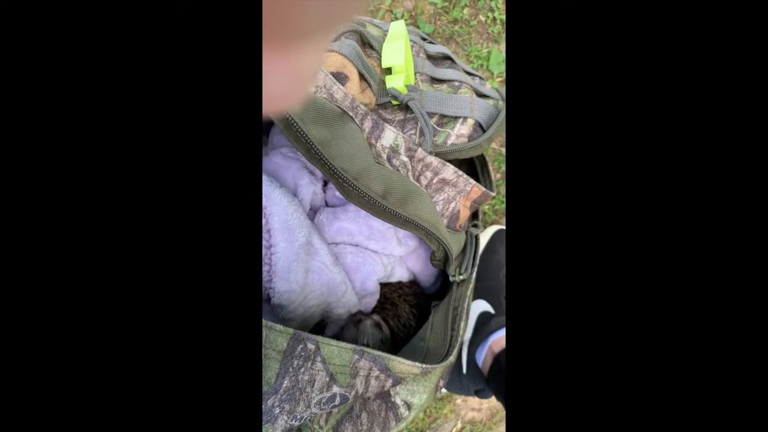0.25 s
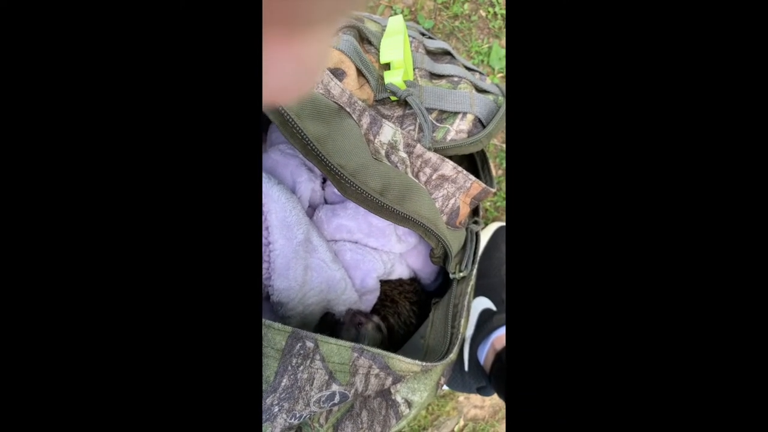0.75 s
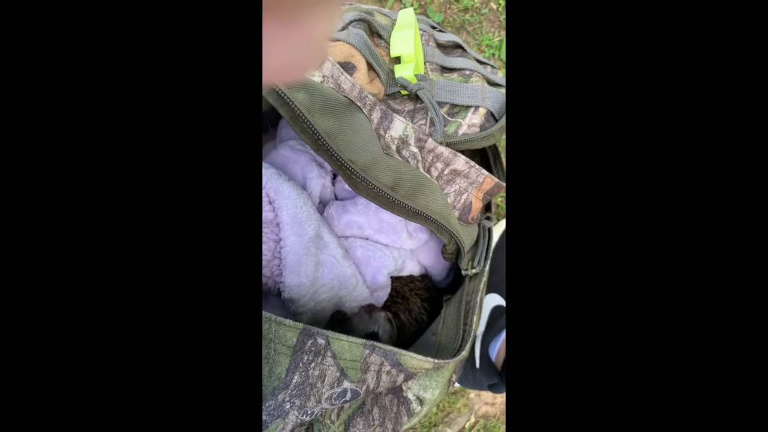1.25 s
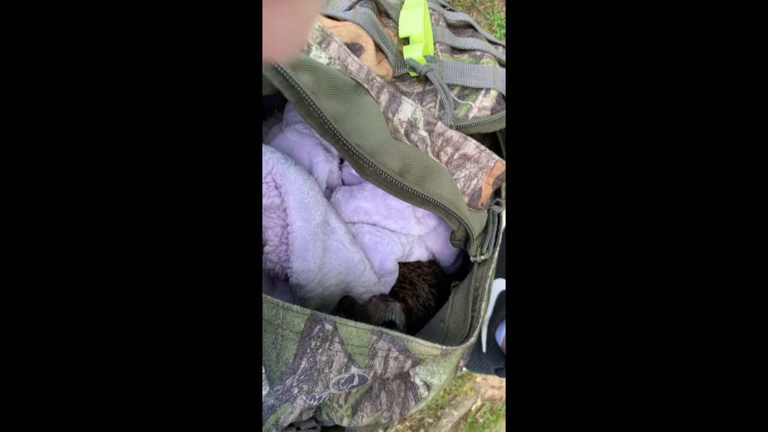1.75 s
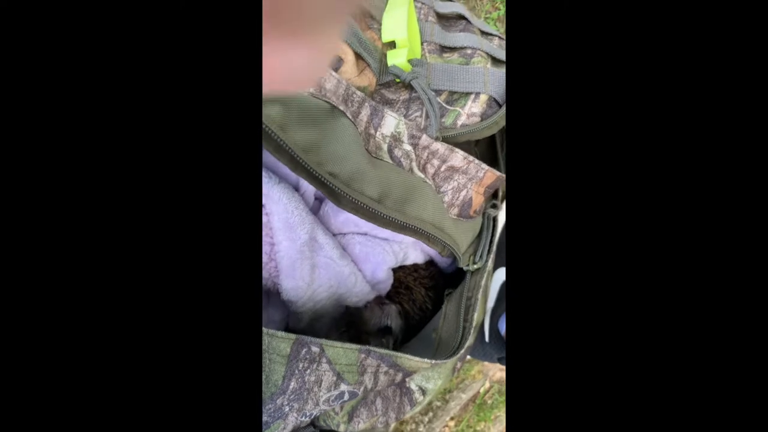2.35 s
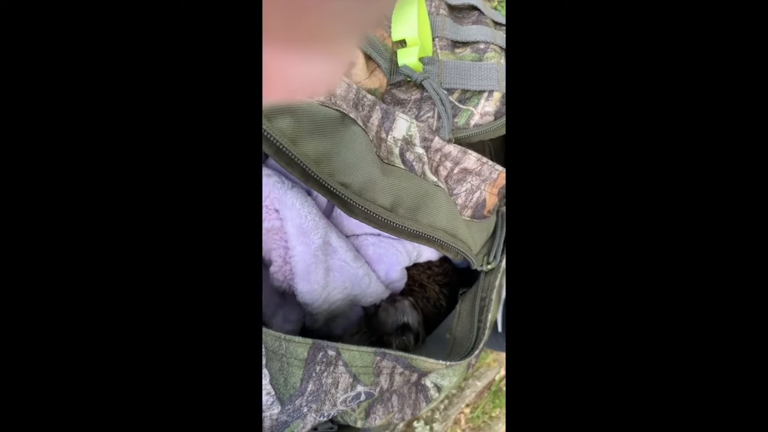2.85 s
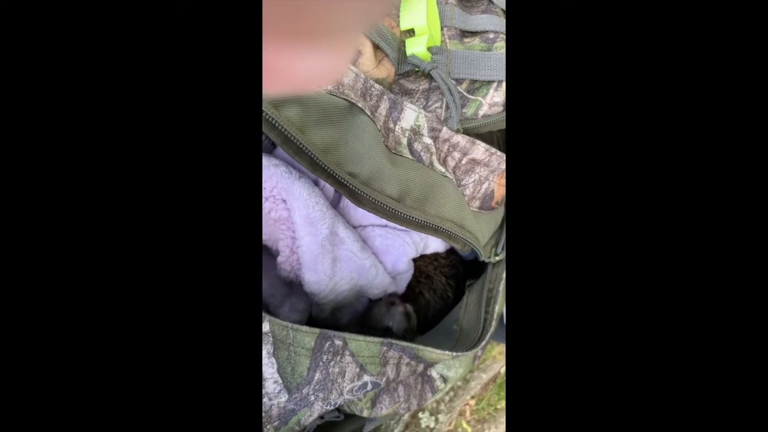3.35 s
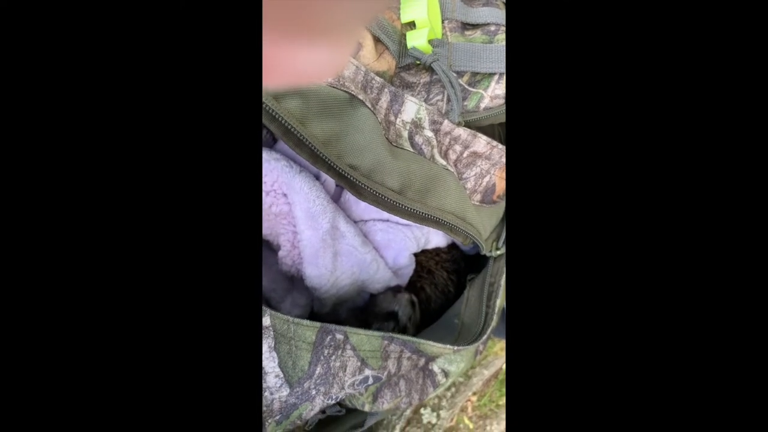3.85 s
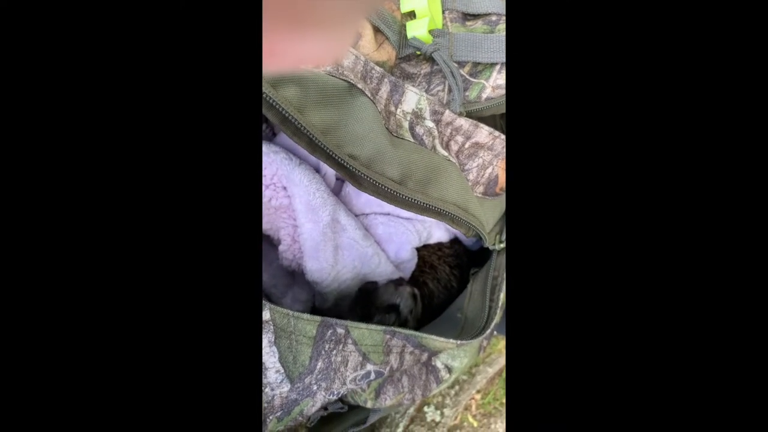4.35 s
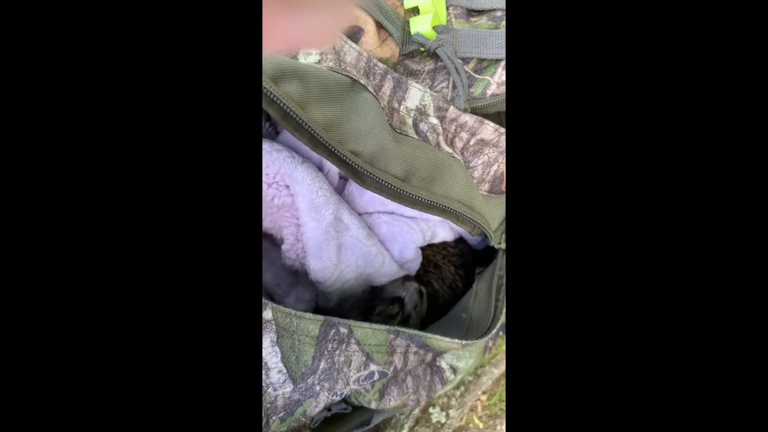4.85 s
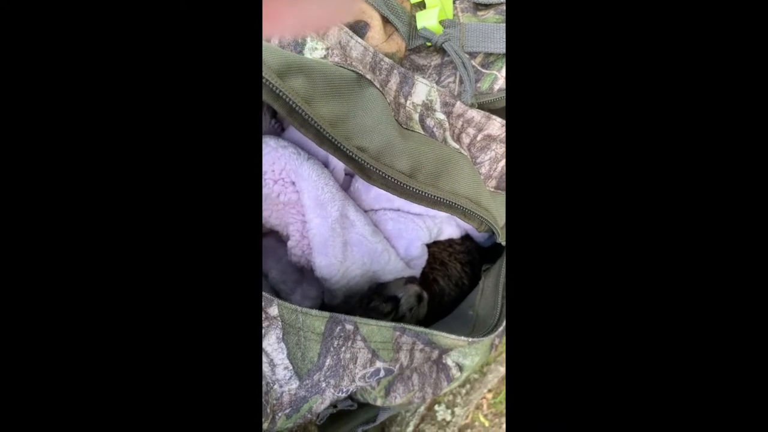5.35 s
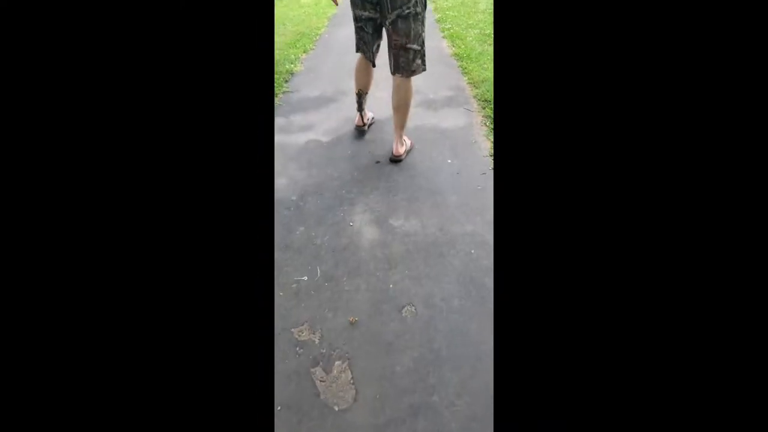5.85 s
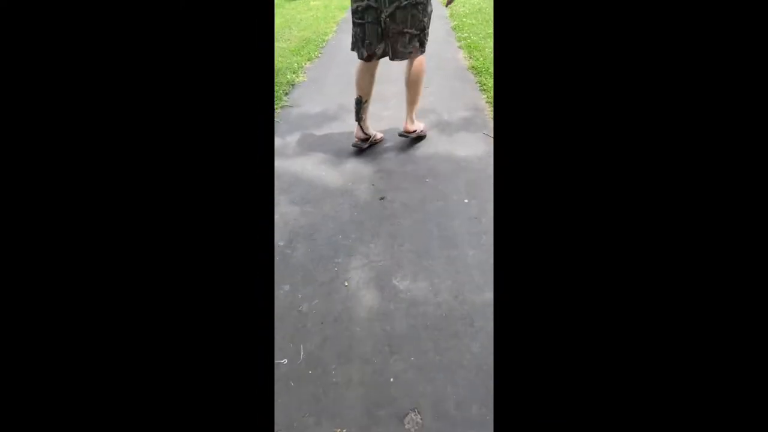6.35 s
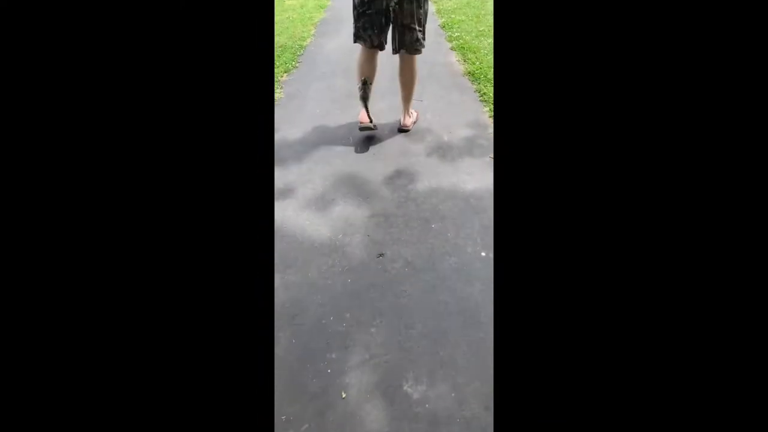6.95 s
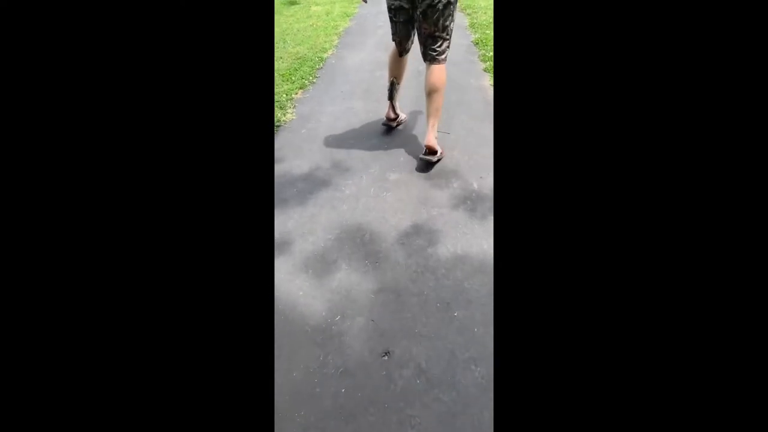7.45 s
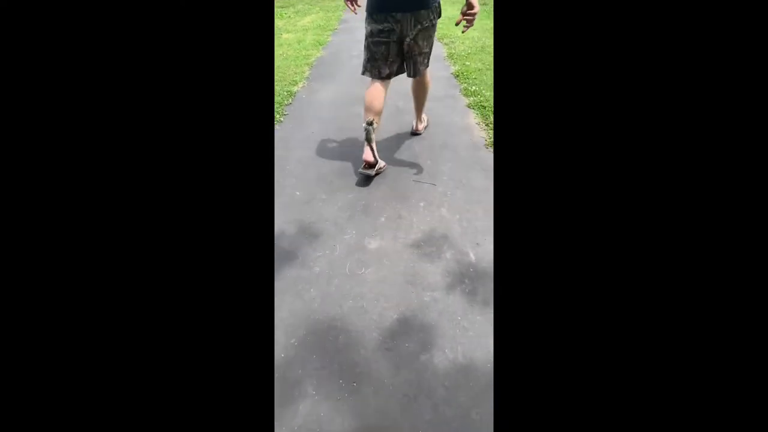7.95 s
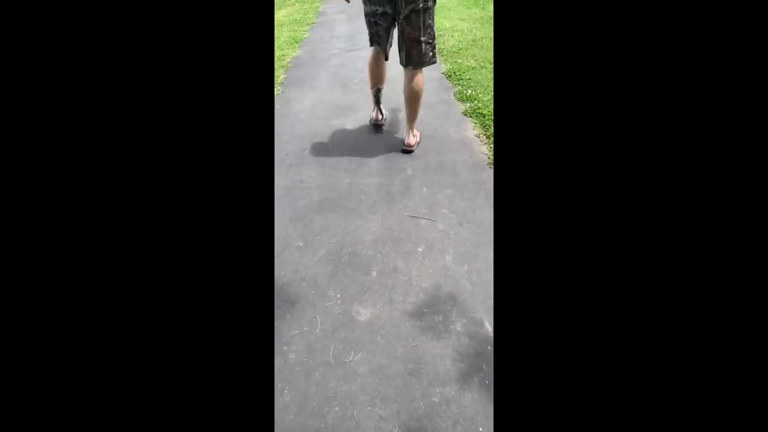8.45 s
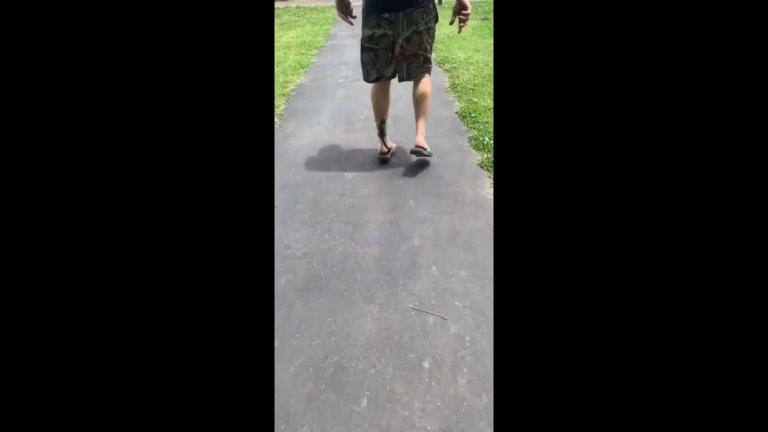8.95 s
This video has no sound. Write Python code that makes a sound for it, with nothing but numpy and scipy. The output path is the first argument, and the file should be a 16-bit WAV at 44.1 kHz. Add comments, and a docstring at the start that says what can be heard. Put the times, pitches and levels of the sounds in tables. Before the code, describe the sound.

Close, loud wind buffets overload a phone microphone in the grass, masking soft high hiss, brief chirps and low engine drone. A hard cut and a momentary gap lead to a calmer paved path, in mono, where a walker's flip-flops give small dry clicks and gritty scuffs over a pulsing distant engine hum, faint insects and a few tiny metallic jingles.

```python
"""Outdoors in the grass on a breezy day, heard by a phone with two microphone ports, then on a path.
In the grass, shaped noise makes the rumble, wash and buffets of wind; far hiss, gliding bird whistles and
the low notes of two distant engines lie behind. After a hard cut and a short silence comes the path, in mono:
engine notes of nearly equal pitch throb together over soft noise and a thin band of insects. Short noise
bursts and knocks make sandals click and scuff on asphalt, and shaken resonances make something small jingle."""
import sys
import numpy as np
from scipy import signal
from scipy.fft import rfft, irfft, next_fast_len
from scipy.io import wavfile
from scipy.ndimage import uniform_filter1d

SR = 44100
rng = np.random.default_rng(int(sys.argv[2]) if len(sys.argv) > 2 else 0)


def master_out(mix):
    """Clip the mix to full scale and print it as 16-bit PCM to the path in sys.argv[1]."""
    frames = np.transpose(np.atleast_2d(mix))
    ceiling = np.clip(frames, -1, 1)
    pcm = np.round(ceiling * 32767).astype(np.int16)
    wavfile.write(sys.argv[1], SR, pcm)


N = 406161
TIME = np.arange(N) / SR  # s
SIZE = next_fast_len(N)
HZ = np.arange(SIZE // 2 + 1) * SR / SIZE + 1e-3  # just above zero, so that the logarithm exists
LOG_HZ = np.log(HZ)
CUT_S, RESUME_S = 5.7484, 5.836  # the grass stops, the path starts
LEFT_RIGHT = np.array([[1], [-1]])  # opposite signs on the two ports


def undb(db):
    """Turn decibels into a plain gain."""
    return 10 ** (np.asarray(db) / 20)


def curves(table):
    """Draw straight lines through each column of a table, over the times in its first column."""
    s, *columns = np.transpose(table)
    return [np.interp(TIME, s, column) for column in columns]


def walk(rate):
    """Random levels held for 1 / rate seconds, then smoothed twice into a wandering line; spread near 1."""
    hold = int(SR / rate)
    steps = np.repeat(rng.standard_normal(N // hold + 1), hold)
    return 1.289 * uniform_filter1d(uniform_filter1d(steps, hold), hold)[:N]


def shape(x, gain):
    """Filter x by a gain on HZ; white noise of rms 1 keeps rms 1."""
    even_gain = gain / np.sqrt(np.mean(abs(gain) ** 2))
    return irfft(rfft(x, SIZE) * even_gain, SIZE)[:N]


def colour(x, points):
    """Give x the tone of a spectrum; only the differences between its levels matter."""
    hz, db = np.transpose(points)
    return shape(x, undb(np.interp(LOG_HZ, np.log(hz), db, left=-120, right=-120)))


def gusty(points, rate, patchy_db):
    """Coloured noise whose source swells and flickers; rms 1."""
    level_db = patchy_db * (walk(rate) + 0.87 * walk(4 * rate))
    x = colour(rng.standard_normal(N) * undb(level_db), points)
    return x / np.std(x)


def eddies(points, rate, spread_db, bed_db):
    """Short puffs of noise, uneven in size, over a steadier stream, like small eddies breaking; rms 1."""
    hits = (rng.random(N) < rate / SR) * undb(spread_db * rng.exponential(size=N))  # rate: puffs per second
    puffs = uniform_filter1d(uniform_filter1d(hits, 150), 100)
    strength = (puffs / np.std(puffs) + undb(bed_db)) * undb(2 * walk(8.8))
    x = colour(strength * rng.standard_normal(N), points)
    return x / np.std(x)


def bursts(times, db, lengths, rise=1.):
    """Envelope of sharp bumps that grow over rise x length and die away over the length."""
    env = np.zeros(N)
    for s, gain, length in zip(times, undb(db), np.maximum(lengths, 5e-4)):
        near = slice(max(int((s - .1) * SR), 0), int((s + 0.14) * SR))
        t = TIME[near] - s
        env[near] += gain * np.exp(np.where(t < 0, t / rise, -t) / length)
    return env


def bumps(table):
    """Sum of smooth bell shapes from rows of time (s), height and length (s)."""
    s, height, length = np.transpose(table)[:, :, None]
    coarse = TIME[::32]  # smooth enough to draw on fewer points
    bells = np.sum(height * np.exp(-((coarse - s) / length) ** 2), axis=0)
    return np.interp(TIME, coarse, bells)


CANCEL_S = 7.82  # all engine cycles pass zero here, so notes of opposite sign oppose each other


def engine(hz, orders, drift, wobble_db):
    """Steady notes on multiples of a slowly drifting cycle; each note wavers on its way through the air."""
    turns = np.cumsum(hz * (1 + drift * walk(1.5))) / SR
    turns = turns - turns[int(CANCEL_S * SR)]
    notes = 0
    for multiple, db in orders:
        loudness = np.sqrt(2) * undb(db + wobble_db * walk(4))
        notes = notes + loudness * np.sin(2 * np.pi * multiple * turns)
    return notes


# High far hiss, tone: f/Hz, level/dB
HIGH_HISS_TONE = [(3500, -22), (3900, -1), (4600, 0), (5500, -5), (6800, -6), (7900, -14), (8700, -10),
                  (9400, -17), (11000, -20), (15500, -27)]
# High far hiss, loudness: t/s, level/dB
HIGH_HISS_LEVEL = [(0, -54), (.5, -59), (1.5, -56), (2.3, -58.5), (2.75, -58.5), (3, -56), (3.3, -58.5),
                   (4.2, -57.5), (4.6, -59), (5.2, -61.5), (5.75, -65.5)]
# How the high hiss meets the two ports: f/Hz, phase by which left leads/rad, share common to both/0-1
HISS_PORTS = [(3300, 1.3, .7), (3800, 1.7, .8), (4800, 3.14, .99), (5900, 4.75, .9), (6950, 6.28, .97),
              (8000, 7.8, .85), (9100, 9.42, .99), (10000, 10.7, .8), (15600, 18.9, .9)]


def high_hiss():
    """Far hiss: one part reaches the left port early, the rest is unrelated on the two ports."""
    hz, lead, share = np.transpose(HISS_PORTS)
    lead = np.interp(HZ, hz, lead)
    share = np.clip(np.interp(HZ, hz, share), 0, 1)
    swell = undb(1.1 * walk(7))
    common, left, right = (rfft(swell * rng.standard_normal(N), SIZE) for _ in range(3))
    turn, apart = np.exp(.5j * lead), np.sqrt(1 - share ** 2)
    left_spectrum = share * turn * common + apart * left
    right_spectrum = share / turn * common + apart * right
    ports = irfft(np.array([left_spectrum, right_spectrum]), SIZE)[:, :N]
    return undb(curves(HIGH_HISS_LEVEL)[0]) * np.array([colour(x, HIGH_HISS_TONE) for x in ports])


# Three lower bands of far hiss, tone of each: f/Hz, level/dB
TURNING_TONES = [
    [(1400, -25), (1800, -2), (2200, 0), (2600, -3), (2750, -20)],
    [(2550, -20), (2750, 0), (3050, 0), (3250, -20)],
    [(3050, -20), (3250, 0), (3700, -4), (4100, -25)],
]
# Their changing direction as the phone turns, one list per band:
# t/s, level/dB, phase by which left leads/rad, share common to both ports/0-1
TURNING_PATHS = [
    [(0, -54, 2.7, 0.8), (1.2, -52.5, 2.6, 0.7), (2, -54, .5, 0.45), (2.6, -55.5, 2.2, .5),
     (3, -52.5, 1, 0.56), (3.5, -56, 1.7, 0.53), (4.1, -55.5, 3.1, 0.88), (4.7, -56.5, 2.4, 1),
     (5.75, -58, 3.1, 0.79)],
    [(0, -56, 2.7, 0.83), (.7, -61, 2.2, 0.85), (1.2, -52, 3.5, 0.88), (2.1, -55, 3.2, 0.92),
     (2.6, -62, 4.1, .5), (3, -56, 6.6, .6), (3.5, -64.5, 6, 0.43), (4.1, -60, 4.3, 0.87),
     (4.7, -61.5, 3.35, 0.98), (5.75, -64.5, 3.5, 0.8)],
    [(0, -60, 1.1, 1), (.7, -60, 1.4, 0.9), (1.2, -59, 2.75, 0.9), (2.1, -61, 2, 0.8), (2.6, -63.5, 2, 0.5),
     (3, -60.5, 1, .75), (3.5, -62, 1.1, .8), (4.1, -63.5, .6, .7), (4.7, -65.5, .8, 0.6),
     (5.75, -67, 1.5, .7)],
]


def turning_hiss(points, table):
    """A band of hiss whose lead on the left port and likeness on both move in time."""
    db, lead, share = curves(table)
    share = np.clip(share, 0, 1)
    common, left, right = (gusty(points, rate=5.1, patchy_db=2.0) for _ in range(3))
    quarter_late = shape(common, np.full(len(HZ), -1j))  # the same band a quarter turn late
    across, along = quarter_late * np.sin(lead / 2), common * np.cos(lead / 2)
    apart = np.sqrt(1 - share ** 2)
    left_port = share * (along - across) + apart * left
    right_port = share * (along + across) + apart * right
    return undb(db) * np.array([left_port, right_port])


# Faint far bird notes: t/s, start f/Hz, end f/Hz, length/s, level/dB
CHIRPS = [(.02, 3370, 3180, .04, -59), (.08, 3330, 3200, .07, -61), (.22, 3290, 3320, .08, -62),
          (.3, 2920, 2780, .05, -61), (.37, 3300, 3340, .07, -62), (.46, 3330, 3310, .09, -65),
          (.685, 3150, 3330, .06, -59), (.79, 2780, 2770, .05, -59), (.83, 2800, 2850, .05, -66),
          (.91, 2720, 2780, .06, -65), (2.28, 3370, 3050, .07, -59), (2.86, 3340, 3200, .07, -60),
          (2.91, 2880, 2720, .07, -62), (2.97, 2720, 2950, .05, -61), (3.13, 2820, 2760, .06, -62)]


def chirps():
    """Bird notes: gliding whistles, slightly hoarse from a wavering pitch, that come from one side."""
    out = np.zeros((2, N))
    waver = np.cumsum(35 * walk(60)) / SR  # a pitch spread near 35 Hz, as turns
    lead = 1 / 2 * LEFT_RIGHT  # the left port leads by 1 radian
    for s, start_hz, end_hz, length, db in CHIRPS:
        near = slice(max(int((s - length) * SR), 0), int((s + length) * SR))
        t = TIME[near] - s
        glide = (start_hz + end_hz) / 2 * t + (end_hz - start_hz) / length * t ** 2 / 2
        loudness = np.sqrt(2) * undb(db) * np.exp(-(2 * t / length) ** 2)
        out[:, near] += loudness * np.sin(2 * np.pi * (glide + waver[near]) + lead)
    return out


GRASS_HZ = 28.25  # middle of the drifting engine cycle
# Engine notes in the grass: multiple of the cycle, level/dB before the swell
GRASS_NOTES = [(2, -24.5), (3.15, -28), (4, -27), (4.45, -36), (6, -34.5)]


def grass_engines(rumble_db):
    """Low notes of the distant engines, swelling along with the rumble."""
    swell_db = rumble_db - np.mean(rumble_db[TIME < CUT_S])
    return undb(swell_db) * engine(GRASS_HZ, GRASS_NOTES, drift=0.011946, wobble_db=3.5)


# Deep wind rumble, tone: f/Hz, level/dB
RUMBLE_TONE = [(15, -32), (28, -4), (55, 1), (100, -3.5), (170, -5), (240, -20), (400, -39.5)]


def rumble(rumble_db):
    """Deep rumble of the wind: low noise that swells slowly."""
    return undb(rumble_db) * gusty(RUMBLE_TONE, rate=6, patchy_db=2.0)


# Wind that pushes the ports in opposite ways: t/s, rumble level/dB, flutter level/dB
CROSS_LEVELS = [(0, -26.5, -31), (.3, -25.5, -27.5), (.9, -29, -34.5), (1.2, -31.5, -36.5), (1.4, -30, -33),
                (1.7, -32.5, -36.5), (2, -20.5, -30), (2.5, -25, -28), (3, -31, -37.5), (3.4, -19, -28.5),
                (3.75, -27, -31), (4, -20, -29.5), (4.2, -25, -31.5), (4.4, -21, -30.5), (5.2, -23, -30.5),
                (5.75, -29, -34.5)]
# Its rumble, tone: f/Hz, level/dB
CROSS_RUMBLE_TONE = [(15, -43.5), (25, -3.5), (55, -0.5), (170, 4.5), (260, -10.5), (400, -36)]
# Its flutter, tone: f/Hz, level/dB
FLUTTER_TONE = [(150, -9), (260, 1.5), (320, -2), (375, 0), (420, -4), (800, -14), (1500, -25), (2200, -47)]


def crosswind():
    """Wind across the phone: rumble and flutter of opposite sign on the two ports."""
    rumble_db, flutter_db = curves(CROSS_LEVELS)
    push = undb(rumble_db) * gusty(CROSS_RUMBLE_TONE, rate=17, patchy_db=2.0)
    push += undb(flutter_db) * eddies(FLUTTER_TONE, rate=110, spread_db=0.5, bed_db=4.0)
    return push * LEFT_RIGHT


# Wash of the wind in three bands, tone of each: f/Hz, level/dB
LOW_WASH_TONE = [(150, -5), (230, 3.5), (310, -2), (370, 5), (400, -0.5), (430, -9.5), (600, -19.5),
                 (800, -38)]
HIGH_WASH_TONE = [(400, -20.5), (600, 1.5), (900, -8.5), (1150, -8.5), (1400, -26)]
TOP_WASH_TONE = [(1000, -20), (1250, -0.5), (1700, -1), (2000, -7.5), (2600, -34.5)]
# Loudness of the top band: t/s, level/dB
TOP_WASH_LEVEL = [(0, -50.5), (.6, -50.5), (1.2, -50.5), (1.8, -53), (2.4, -51.5), (3, -49.5), (3.5, -51),
                  (4, -55), (4.5, -56.5), (5, -50.5), (5.45, -53), (5.75, -54.5)]
# Brief dips set in the level of the noise: t/s, depth/dB, length/s
DIPS = [(2.01, 9, 0.035), (2.12, 4, 0.016), (3.237, 17, 0.019), (3.33, 16, .018), (3.375, 9.5, 0.014),
        (3.465, 16, 0.04), (3.86, 7.5, 0.038), (3.96, 6, 0.025), (4.372, 20, 0.032), (4.5, 6.5, 0.027),
        (4.63, 1.5, .03), (5.018, 11, 0.029), (5.151, 24, 0.061), (5.328, 23, 0.031), (5.578, 15, 0.03),
        (5.676, 9, 0.029)]
LOW_DIP_SHARE, TOP_DIP_SHARE = 0.55, 0.62  # share of the dip depth that these bands take


def wash(low_db, high_db, stir):
    """Wash of the wind: small eddies break on the port in three bands; buffets stir up the lowest."""
    dip_db = bumps(DIPS)
    top_db = curves(TOP_WASH_LEVEL)[0]
    low_gain = stir * undb(low_db - LOW_DIP_SHARE * dip_db)
    out = low_gain * eddies(LOW_WASH_TONE, rate=120, spread_db=4.0, bed_db=1.5)
    out += undb(high_db - dip_db) * eddies(HIGH_WASH_TONE, rate=100, spread_db=2.0, bed_db=8.5)
    top_gain = undb(top_db - TOP_DIP_SHARE * dip_db)
    return out + top_gain * eddies(TOP_WASH_TONE, rate=110, spread_db=2.5, bed_db=11.5)


# Large buffets on the phone: t/s, level/dB, treble level relative to it/dB
BUFFETS = [(.05, -26.5, -18.5), (.151, -25.5, -5.5), (.196, -26, -16.5), (.24, -27.5, -15.5),
           (.265, -17, -9.5), (.316, -15, -12.5), (.354, -21.5, -6.5), (.384, -23.5, -14),
           (.41, -22.5, -8.5), (.431, -21.5, -16), (.448, -24, -18), (.464, -21.5, -18),
           (.489, -26.5, -12.5), (.57, -23, -24), (.593, -29, -18), (.629, -20.5, -7.5), (.69, -28, -12.5),
           (.811, -17.5, -16.5), (.823, -18.5, -17), (.876, -24.5, -21), (1.125, -25.5, -15.5),
           (1.495, -13.5, -19), (1.526, -17, -19.5), (2.076, -13.5, -14.5), (2.246, -19.5, -17),
           (2.265, -18, -8.5), (2.279, -13.5, -10), (2.327, -26, -9), (2.355, -19, -12.5),
           (2.385, -25, -14), (2.516, -24, -16.5), (2.537, -18, -17.5), (2.588, -16, -14.5),
           (2.719, -21, -5.5), (2.729, -17, -3.5), (2.765, -16, -8), (2.83, -25.5, -15.5),
           (2.866, -26.5, -10.5), (2.887, -26.5, -13), (2.931, -19, 1.5), (2.941, -25.5, 1.5),
           (3.554, -24, -12.5), (3.602, -15.5, -15), (3.635, -23, -19.5), (3.707, -24, -21.5),
           (3.765, -22.5, -18.5), (4.082, -16, -13.5), (4.142, -20, -13.5), (4.292, -10, -8),
           (4.545, -24.5, -16), (4.564, -19, -14), (4.853, -24.5, -12), (4.87, -13, -6.5),
           (4.902, -27, -11), (5.383, -33.5, -7.5), (5.397, -20.5, -19), (5.416, -20.5, -12.5),
           (5.472, -16, -16.5), (5.6, -38.5, 0), (5.628, -32.5, -7.5), (5.705, -36.5, -8)]
# Body, ragged middle and treble of a buffet, tone of each: f/Hz, level/dB
BODY_TONE = [(60, -13), (200, 4.5), (450, -2.5), (900, -19), (1500, -42.5)]
RAG_TONE = [(350, -11.5), (550, 3.5), (800, -2.5), (1200, -16.5), (1800, -30)]
TREBLE_TONE = [(500, 0), (900, 3.5), (1300, -2), (1900, -22.5), (2600, -38)]
BODY_S, RAG_S, TREBLE_S = 0.01, 0.009, 0.0027  # decays
TREBLE_LEAD_S, RAG_DB = 0.0023, -14  # the treble comes first; the rag lies under the buffet level
KICK, SUCK, SUCK_S = 0.39, 0.29, 0.0028  # opening snap and pull, as shares of a buffet; length of the pull
SMALL_PER_S, SMALL_DB = 4, -36  # small buffets: number per second, level of the loudest
HEAVE, HEAVE_S = 1.9, 0.014  # lift of the rumble: gain per unit of buffet size, length
STIR, STIR_S = 3.9, 0.016  # lift of the low wash: gain per unit of buffet size, length


def buffets():
    """Blows of wind snap and pull the membrane; also returns how much they lift rumble and low wash."""
    small = rng.random((int(SMALL_PER_S * CUT_S), 3))
    small = small * [CUT_S, -8, -10] + [0, SMALL_DB, -6]  # random time, level and treble
    s, db, treble_db = np.vstack([BUFFETS, small]).T
    same = np.ones(len(s))
    early_s, treble_db = s - TREBLE_LEAD_S, db + treble_db
    body = rng.standard_normal(N) * bursts(s, db, BODY_S * same, rise=0.57)
    pull = SUCK * bursts(s, db, SUCK_S * same)
    treble = rng.standard_normal(N) * bursts(early_s, treble_db, TREBLE_S * same, rise=0.86)
    snap = KICK * bursts(early_s, treble_db, 0 * same)  # as short as bursts allows
    rag_level = bursts(s, db + RAG_DB, RAG_S * same, rise=0.64)
    blows = colour(body - pull, BODY_TONE) + colour(treble - snap, TREBLE_TONE)
    blows += rag_level * eddies(RAG_TONE, rate=170, spread_db=2.5, bed_db=1.5)
    heave = 1 + HEAVE * bursts(s, db, HEAVE_S * same)
    stir = 1 + STIR * bursts(s, db, STIR_S * same)
    return blows, heave, stir


# The breeze, the same on both ports: t/s, rumble level/dB, low wash level/dB, high wash level/dB
BREEZE = [(0, -18.5, -32.5, -43), (.35, -19, -29.5, -42.5), (.8, -19.5, -33, -47.5), (1.1, -18, -34, -45),
          (1.35, -19, -27.5, -43), (1.75, -17.5, -34, -42), (2.05, -17.5, -41, -45), (2.3, -17, -29, -42.5),
          (2.65, -16, -35.5, -45), (2.85, -17.5, -40.5, -41.5), (3.15, -15.5, -34, -45.5),
          (3.4, -17.5, -38, -49.5), (3.66, -16, -30.5, -46), (3.95, -17.5, -32.5, -51),
          (4.17, -17.5, -30, -47.5), (4.45, -17, -39.5, -51), (4.75, -19.5, -34, -50),
          (5.1, -18.5, -35, -49.5), (5.4, -19.5, -31.5, -49), (5.55, -21, -36, -49),
          (5.75, -23.5, -39, -52)]


def grass():
    """In the grass: hiss and birds behind, crosswind in opposition, engines and wind in the middle."""
    rumble_db, low_db, high_db = curves(BREEZE)
    blows, heave, stir = buffets()
    behind = sum(map(turning_hiss, TURNING_TONES, TURNING_PATHS)) + high_hiss() + chirps()
    deep = heave * (rumble(rumble_db) + grass_engines(rumble_db))
    middle = deep + wash(low_db, high_db, stir) + blows
    return behind + crosswind() + middle


# Background on the path, tone: f/Hz, level/dB
PATH_TONE = [(15, -37), (30, 3.5), (48, 2.5), (72, 4.5), (106, 7), (128, -0.5), (250, -0.5), (470, -2),
             (575, -14), (1300, -10.5), (2500, -19.5), (4500, -25.5), (9300, -29.5), (11000, -35),
             (15500, -50)]
PATH_DB, PATH_RISE_DB_S = -44, 0.64  # level where the path starts, slow growth in dB per second


def path_background():
    """Wide, gently swelling noise that grows slowly."""
    level_db = PATH_DB + PATH_RISE_DB_S * (TIME - RESUME_S)
    return undb(level_db) * gusty(PATH_TONE, rate=7.3, patchy_db=0.92)


# Thin band of insects, tone: f/Hz, level/dB
INSECT_TONE = [(2800, -16), (3100, -8), (3270, 0), (3450, -4), (3650, -10), (3900, -28)]
# Loudness of the insects: t/s, level/dB
INSECT_LEVEL = [(5.84, -68), (6.2, -65), (6.5, -65), (7.3, -66), (7.55, -67), (7.75, -63), (8.06, -61.5),
                (8.3, -64.5), (8.75, -64.5), (9.1, -59), (9.21, -61)]


def insects():
    """Far insects: a thin, flickering band of noise."""
    return undb(curves(INSECT_LEVEL)[0]) * gusty(INSECT_TONE, rate=9, patchy_db=1.5)


# Swell of the engines on the path: t/s, slow engine level/dB, quick engine level/dB
SWELL = [(5.84, -4, -2.5), (6.5, -2.5, 2.5), (6.9, -5.5, -1), (7.4, -3, -3.5), (7.9, -3, -1),
         (8.3, -0.5, -2.5), (8.8, -2, 4.5), (9.21, 1.5, 1.5)]
# Firing cycles: t/s, slow engine f/Hz, quick engine f/Hz
PACE = [(5.84, 28.62, 30.2), (6.6, 28.7, 30.1), (7.2, 28.87, 29.85), (8.2, 28.87, 29.7),
        (8.6, 28.62, 29.65), (9.21, 28.7, 29.75)]
# Notes of the slow and of the quick engine: multiple of the firing cycle, level/dB before the swell
SLOW_NOTES = [(1, -73), (2, -37), (3, -46), (5, -43), (6, -52), (7, -56.5), (8, -65), (10, -59.5),
              (11, -56.5)]
QUICK_NOTES = [(3, -42), (6, -46.5), (9, -54.5), (12, -58.5), (15, -57.5), (18, -64.5)]
LOW_NOTE_HZ, LOW_NOTE_DB = 55.5, -42  # a lower note that beats with the slow engine
LOW_NOTE_SWELL_S = 1.  # it is loudest at CANCEL_S and fades on both sides


def path_engines():
    """Two engines and a low note; notes close in pitch drift in and out of step, which makes the throb."""
    slow_db, quick_db = curves(SWELL)
    slow_hz, quick_hz = curves(PACE)
    slow = undb(slow_db) * engine(slow_hz, SLOW_NOTES, drift=.001, wobble_db=1.2)
    quick = undb(quick_db) * engine(quick_hz, QUICK_NOTES, drift=.003, wobble_db=2.5)
    low = engine(LOW_NOTE_HZ, [(1, LOW_NOTE_DB)], drift=.001, wobble_db=.8)
    low_swell = np.exp(-((TIME - CANCEL_S) / LOW_NOTE_SWELL_S) ** 2)
    return slow - quick - low * low_swell


# Faint jingles: t/s, level/dB, length/s, extra level of the lowest mode/dB
JINGLES = [(6.608, -49, 0.01, 3), (6.962, -50, .014, -14), (7.07, -51.5, 0.022, -8), (8.02, -51, .02, -12),
           (8.72, -53, .015, -12), (9.105, -45, .003, -14), (9.13, -57, .015, -8)]
# Pitches at which the small thing rings: f/Hz, width/Hz, level/dB
JINGLE_MODES = [(5770, 80, 0), (8420, 160, -2), (9270, 70, -1), (10160, 170, -6)]


def jingles():
    """Short shakes of something small ring its modes; the lowest answers each shake by its own amount."""
    s, db, length, low_db = np.transpose(JINGLES)
    out = 0
    for k, (hz, width, mode_db) in enumerate(JINGLE_MODES):
        shake_db = db + mode_db + low_db * (k == 0)
        shake = rng.standard_normal(N) * bursts(s, shake_db, length)
        resonance = 1 / (1 + 1j * (HZ - hz) / (width / 2))
        out = out + shape(shake, resonance) / 2
    return out


# Scuffs on the asphalt: t/s, level/dB, length/s
SCUFFS = [(5.844, -60, 0.062), (6.306, -57, 0.025), (6.417, -62, 0.031), (6.625, -60, 0.025),
          (6.777, -60.5, 0.12), (7.04, -66, 0.12), (7.838, -72, 0.033), (8, -59, 0.2), (8.634, -60, .1),
          (8.99, -55, 0.035), (9.147, -52.5, 0.06)]
# Grit under scuffs and sandals, tone: f/Hz, level/dB
GRIT_TONE = [(3000, -4), (5500, -2), (9000, 0), (13000, -12), (15800, -20)]
SCUFF_BED_DB = -67  # level of the steady bed under the scuffs


def scuffs():
    """Scuffs on asphalt: gritty puffs of noise that swell and fade over a faint steady bed."""
    rub = bumps([(s, undb(db), length) for s, db, length in SCUFFS])
    grit = eddies(GRIT_TONE, rate=150, spread_db=2.2, bed_db=6.5)
    return np.hypot(rub, undb(SCUFF_BED_DB)) * grit


# Sandal clicks: t/s, knock level/dB, grit level/dB, knock f/Hz, slap level/dB, knock decay/s
STEPS = [(6.0835, -43, -45, 1300, -49, .0009), (6.2925, -42, -37, 2600, -49, .0009),
         (6.3165, -47, -52, 2000, -52, .0009), (6.623, -47, -47, 2000, -52, .0009),
         (7.3395, -44, -50, 3500, -46, .0009), (7.3554, -47, -47, 1500, -52, .0009),
         (7.5304, -38, -52, 4300, -50, .0005), (7.6286, -49, -45, 4300, -50, .0007),
         (7.9278, -43, -45, 5700, -50, .0009), (7.9395, -45, -47, 3000, -50, .0009),
         (8.012, -30, -45, 1700, -43, .0009), (8.1095, -38, -51, 2400, -44, .0009),
         (8.6354, -45, -48, 2800, -50, .0009), (8.821, -45, -49, 2500, -50, .0009),
         (8.979, -48, -54, 1750, -42, .004), (8.9935, -41, -56, 1620, -40, .003),
         (9.003, -46, -54, 1500, -42, .003), (9.0125, -42, -56, 1780, -39, .003),
         (9.0795, -27, -40, 1500, -38, .001), (9.1007, -39, -38, 2100, -43, .0009)]
# Slap of the sandal, tone: f/Hz, level/dB
SLAP_TONE = [(800, -18), (1300, 0), (1900, 2), (2400, -6), (4000, -9), (6000, -27)]
SPRAY_S = .0016  # decay of the grit, and shortest decay of the slap


def sandals():
    """Each click is a short dull knock and slap with a spray of grit."""
    s, knock_db, grit_db, knock_hz, slap_db, knock_s = np.transpose(STEPS)
    spray_s = np.full(len(s), SPRAY_S)
    slap_s = np.maximum(spray_s, knock_s)
    grit = colour(rng.standard_normal(N) * bursts(s, grit_db, spray_s, rise=.2), GRIT_TONE)
    slap = colour(rng.standard_normal(N) * bursts(s, slap_db, slap_s, rise=.3), SLAP_TONE)
    nearest = np.searchsorted((s[1:] + s[:-1]) / 2, TIME)  # the nearest click sets the pitch of the knock
    tone = np.sin(2 * np.pi * knock_hz[nearest] * (TIME - s[nearest]))
    return grit + slap + bursts(s, knock_db, knock_s, rise=0.55) * tone


def path():
    """On the path, in mono: background, insects and engines behind jingles, scuffs and sandals."""
    return path_background() + insects() + path_engines() + jingles() + scuffs() + sandals()


def scene():
    """The grass stops dead; after a short silence the path fades in over a few milliseconds."""
    fade_in = np.clip((TIME - RESUME_S) / 0.0043, 0, 1)
    return grass() * (TIME < CUT_S) + path() * fade_in


TOP_HZ = 15800  # the phone passes little above this


def record(dry):
    """The phone rounds the loudest peaks and cuts the top."""
    soft = np.tanh(.9 * dry) / .9
    sos = signal.ellip(8, .2, 80, TOP_HZ, fs=SR, output="sos")
    settled = signal.sosfilt_zi(sos)[:, None] * soft[None, :, :1]  # starts without a click
    return signal.sosfilt(sos, soft, zi=settled)[0]


dry = scene()
out = record(dry)
master_out(out)
```